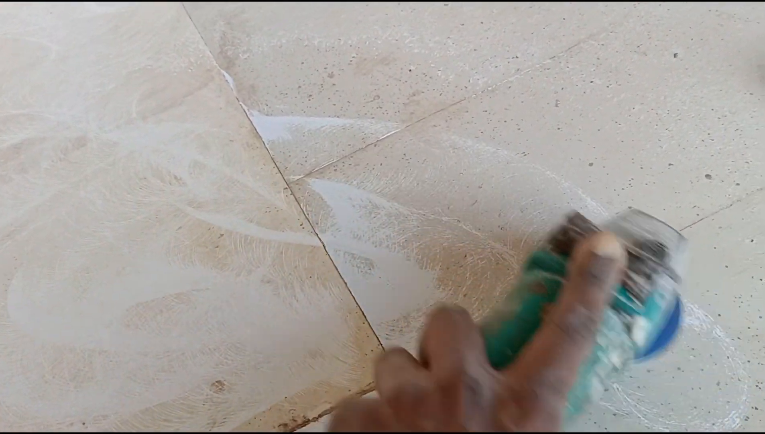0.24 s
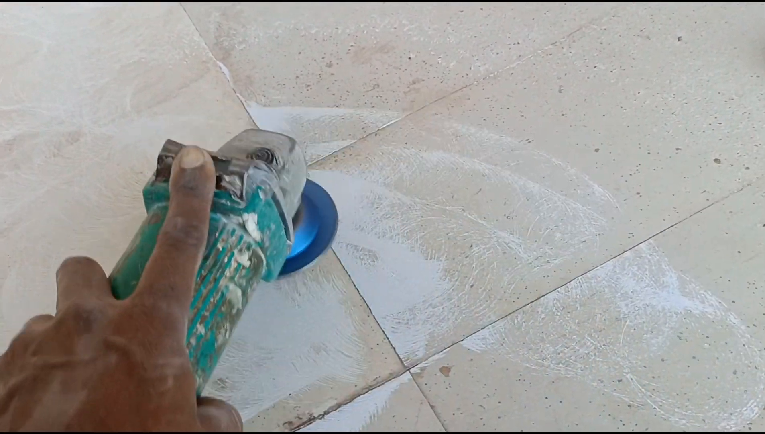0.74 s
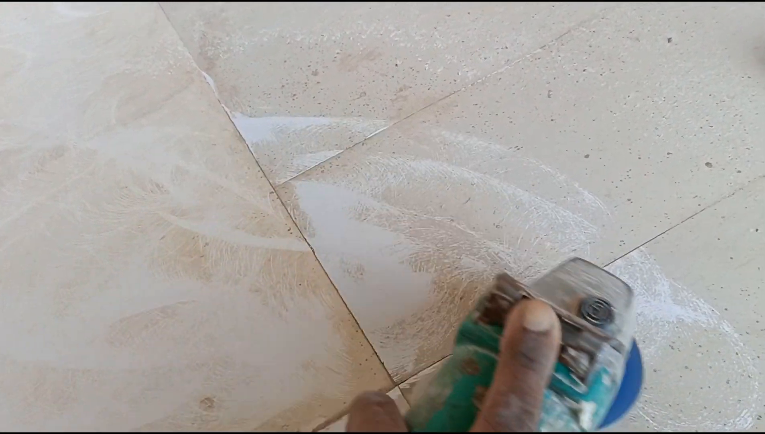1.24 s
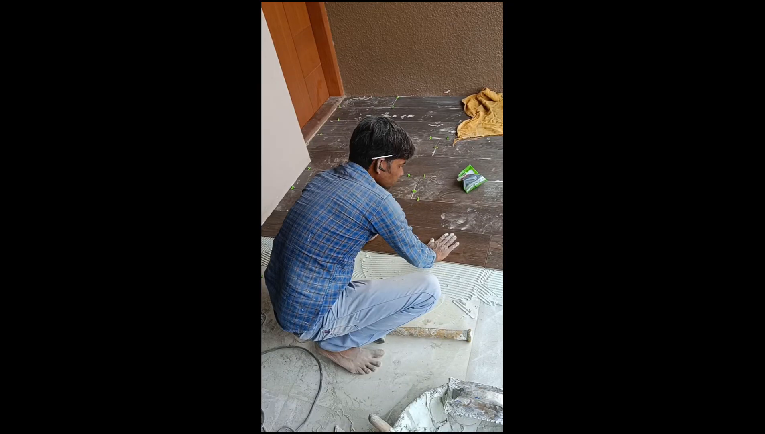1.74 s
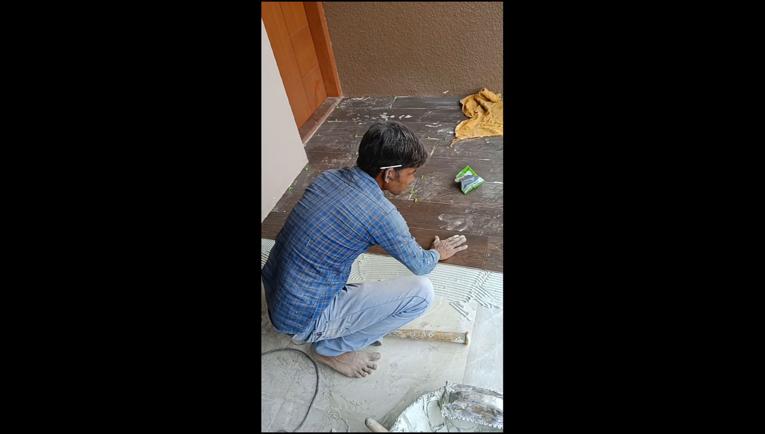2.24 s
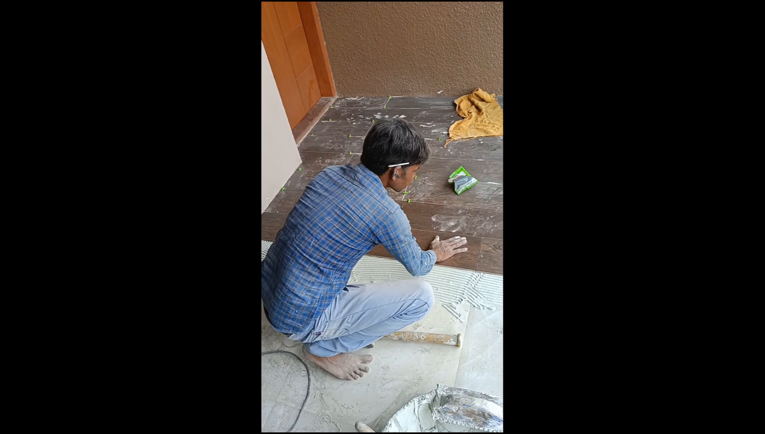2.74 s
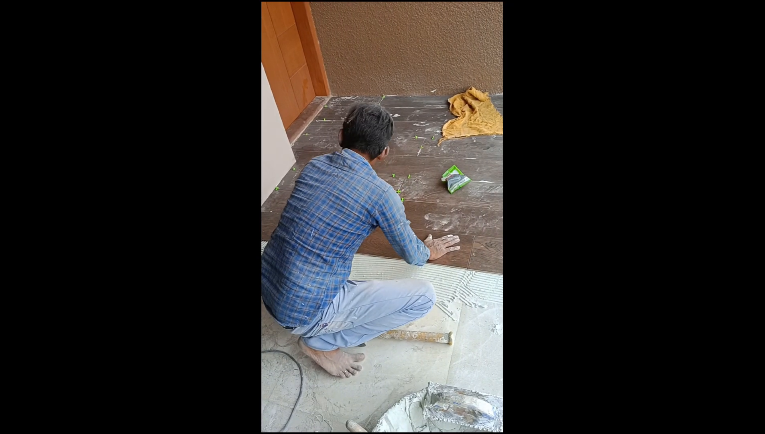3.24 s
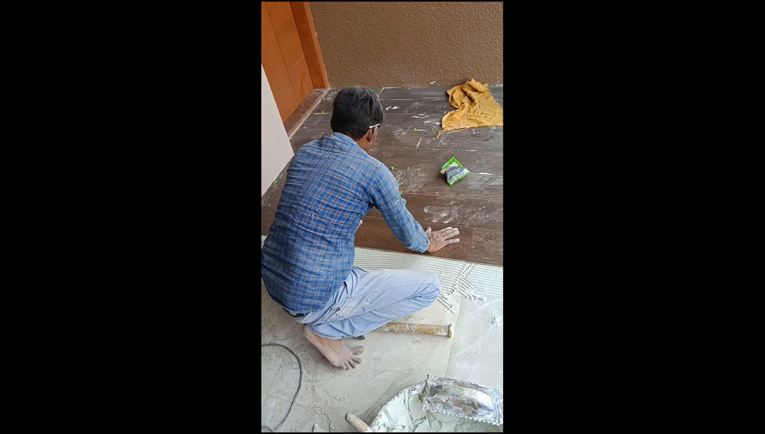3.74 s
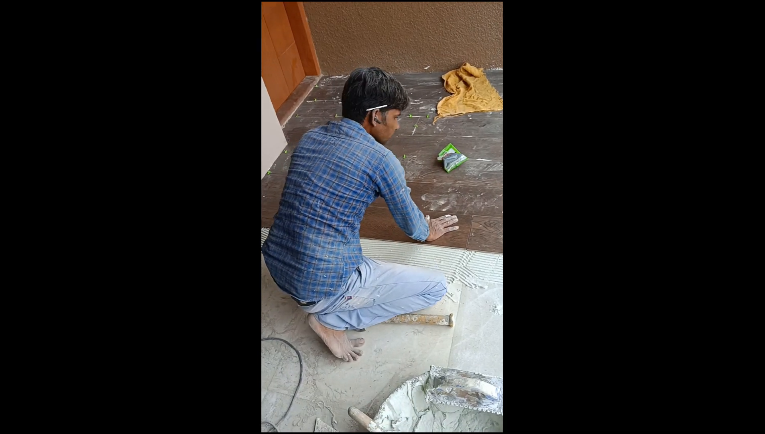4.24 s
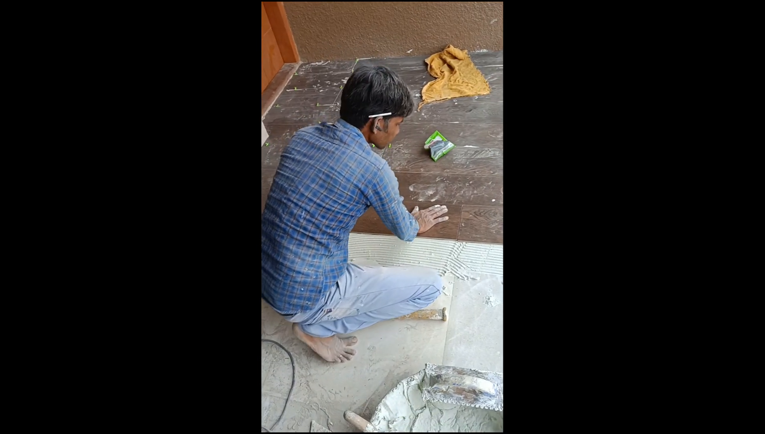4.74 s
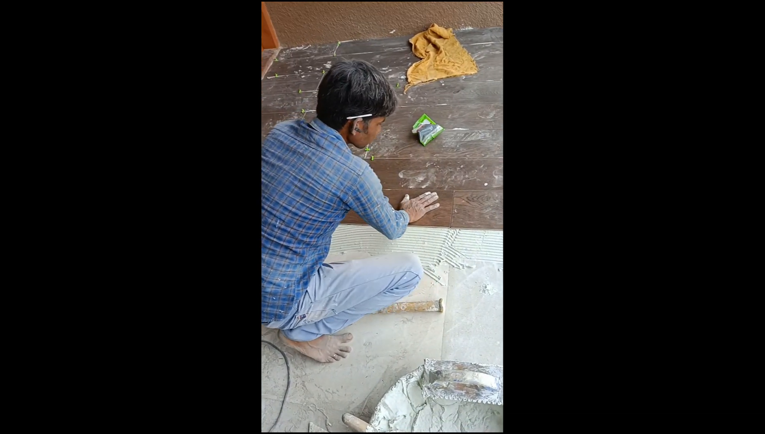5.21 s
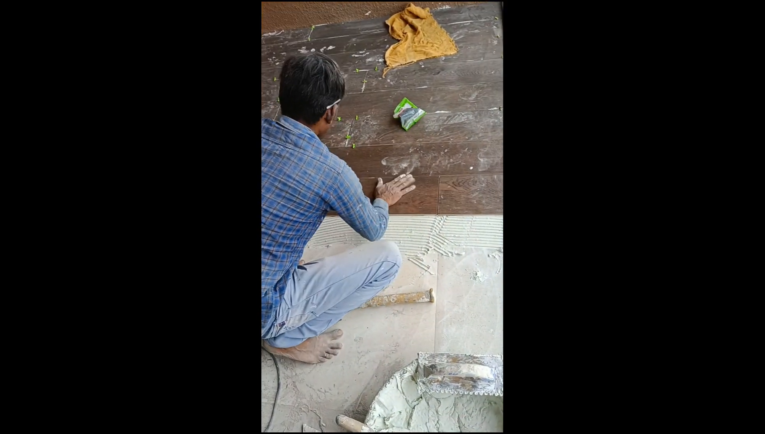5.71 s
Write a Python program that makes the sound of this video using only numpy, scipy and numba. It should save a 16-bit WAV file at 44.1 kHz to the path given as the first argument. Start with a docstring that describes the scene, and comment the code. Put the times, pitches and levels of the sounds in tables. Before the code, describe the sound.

From 0 to 1.4 s an angle grinder scours floor tile right beside a phone: a loud, dense, scratchy roar, stronger on the right, with bassy fan wind slapping the microphone, a low motor hum, faint gear whine, hissing disc ring and a thin squeal around 0.5-0.95 s. It drops away quickly, leaving a very brief gap. From 1.57 s a quiet, bare, reverberant room appears with soft air, low rumble and small wind puffs. A gritty hand wipe swells until 1.84 s. Hard mallet knocks on tile crack at 2.2 and 2.6 s, with short ringing and boomy tails held up by automatic gain. A duller double clack follows at 2.8 s, then small scuffs and ticks from 3.1 to 4.2 s. Dull distant hammer blows recur roughly every half second, with faint far beeps. Another wipe rises at 4.7-4.87 s; the loudest knock lands at 5.8 s, its echo cut by the end.

```python
"""In a room under repair, an angle grinder scours floor tiles close to a phone, its fan blowing on the microphone.
After a cut the room is bare: a tile is knocked down hard, a hand wipes grit over it, someone hammers far away.
Grinder, grit and air are coloured noise whose bands swell and flicker, with sines for shaft, gears and squeal.
Blows are short noise bursts that leave a dying echo; the tile and the room's standing waves ring as sines.
The phone's gain control squeezes the loud knocks so that their tails hang on."""
import sys
import numpy as np
from scipy import signal
from scipy.fft import rfft, irfft, next_fast_len
from scipy.io import wavfile
from scipy.ndimage import uniform_filter1d
from numba import njit

SR = 44100
rng = np.random.default_rng(int(sys.argv[2]) if len(sys.argv) > 2 else 0)


def master(y):
    """Save y as 16-bit WAV."""
    cut = np.clip(np.atleast_2d(y).T, -1, 1)
    pcm = np.round(cut * 32767)  # scale
    wavfile.write(sys.argv[1], SR, pcm.astype(np.int16))


N = 263277
T = np.arange(N) / SR
CUT_S, BACK_S, FADE_S = 1.436, 1.567, 0.026  # grinder starts to fade, room begins, length of its fade-in

# Frequency axes in octaves (log2 of Hz): whole sound, short moving frames, single blows
M = 2 * next_fast_len(N // 2 + SR // 8)
LOGF = np.log2(np.maximum(np.arange(M // 2 + 1) * SR / M, 1))
FRAME, HOP = 1024, 256  # samples
FRAME_LOGF = np.log2(np.maximum(np.arange(FRAME // 2 + 1) * SR / FRAME, 1))[:, None]
FRAME_S = np.arange(N // HOP + 2) * HOP / SR
SHORT = 16384  # samples
SHORT_LOGF = np.log2(np.maximum(np.arange(SHORT // 2 + 1) * SR / SHORT, 1))
LEAD_S = SHORT / SR / 8  # empty time before the contact in each blow
CONTACT_S = np.maximum(np.arange(SHORT) / SR - LEAD_S, 0)  # time since the contact


def undb(db):
    """Turn decibels into a plain gain."""
    return 10 ** (np.asarray(db) / 20)


def level(x, db):
    """Multiply by the wanted level and divide by the sound's own average level."""
    return x * undb(db) / np.sqrt(np.mean(x ** 2))


def on_log(table, logf=LOGF):
    """Read a (pitch_hz, value) table on a log-frequency axis."""
    hz, value = np.transpose(table)
    return np.interp(logf, np.log2(hz), value)


def shape(x, gain):
    """Filter a sound with one gain per frequency."""
    return irfft(rfft(x, M) * gain, M)[..., :N]


def curves(table, t=T):
    """Read the columns of a table as curves over time."""
    s, *columns = np.transpose(table)
    return [np.interp(t, s, column) for column in columns]


def window(start, end, edge):
    """Rise from 0 to 1 after the start and fall back before the end."""
    return np.clip(np.minimum(T - start, end - T) / edge, 0, 1)


def add(out, s, x):
    """Mix a sound in at s seconds."""
    i = int(s * SR)
    out[..., i:i + x.shape[-1]] += x[..., :N - i]


def walk(rate, count=1):
    """Random levels held about 1 / rate s and smoothed, one value a frame; spread near 1."""
    k = max(int(SR / HOP / rate), 1)
    frames = len(FRAME_S)
    held = np.repeat(rng.standard_normal((count, frames)), k, axis=1)[:, :frames]
    return 2.13 * uniform_filter1d(uniform_filter1d(held, k), k)


def wobble(rate, count=2 * SR):
    """A random walk with one value a sample."""
    return np.interp(T[:count], FRAME_S, walk(rate)[0])


def stereo_noise(alike):
    """Spectra of two noises; alike says how much they share at each frequency."""
    a, b, c, d = rng.standard_normal((4, len(alike))) * np.sqrt(len(alike) / 2)
    mid = (a + 1j * b) * np.sqrt(1 + alike)
    side = (c + 1j * d) * np.sqrt(1 - alike)
    return np.array([mid + side, mid - side])


def bands(spectrum, gain):
    """Play a noise spectrum through a gain that moves over frequency and time."""
    noise = irfft(spectrum, M)[:, :N]
    z = signal.stft(noise, nperseg=FRAME, noverlap=FRAME - HOP)[2]
    moved = z * gain[:, :z.shape[-1]]
    return signal.istft(moved, nperseg=FRAME, noverlap=FRAME - HOP)[1][:, :N]


def restless(spectrum, swell_db, flicker_db, rate, extra_db=0):
    """Noise whose third-octave bands swell together and flicker alone."""
    band = (3 * FRAME_LOGF[:, 0]).astype(int)
    swell = swell_db * walk(3.6)
    flicker = flicker_db * walk(rate, count=band[-1] + 1)[band]
    return bands(spectrum, undb(swell + flicker + extra_db))


def panned(table):
    """Left and right gains from a left-minus-right table."""
    half_db = on_log(table) / 2
    return undb([half_db, -half_db])


def room_alike(logf=LOGF, alike_hz=506):
    """Slow waves press nearly alike on both microphone ports; quick ones differ."""
    return .96 / (1 + (2 ** logf / alike_hz) ** 4)


# How the bare room leans to one side: pitch_hz, left_minus_right_db
ROOM_BALANCE = [(60, 3), (110, 1), (200, 1), (380, -3), (700, 0), (1290, -1), (2380, -6.5), (4400, -0.5),
                (8120, 0.5), (15000, -1)]
# Tone colour of the room air: pitch_hz, level_db (per Hz, relative)
AIR_COLOUR = [(20, -17), (40, -7), (65, -10), (125, -6.5), (220, -8), (500, -15), (1000, -18),
              (2100, -24.5), (3100, -35), (4000, -33), (6500, -36), (8000, -50.5), (12000, -52.5),
              (15800, -50)]
# Puffs of air over the ports: centre_s, half_length_s, level_db
AIR_GUSTS = [(1.663, 0.038, -40), (1.788, .06, -42)]
# Rumble from the street: time_s, level_db
STREET_RUMBLE = [(1.57, -49.5), (1.8, -47), (2.3, -55), (3.6, -51.5), (3.8, -46.5), (4.6, -55),
                 (4.85, -57.5), (5.15, -56), (5.97, -54)]


def background():
    """Quiet room air, low street rumble and gusts on the ports, all made of filtered noise."""
    air = stereo_noise(room_alike()) * undb(on_log(AIR_COLOUR)) * panned(ROOM_BALANCE)
    air = restless(air, swell_db=.3, flicker_db=.8, rate=8)
    gust = stereo_noise(0 * LOGF + 0.25) * np.exp(-((LOGF - np.log2(60)) / 1.12) ** 2)
    puffs = sum(undb(db) * np.exp(-((T - s) / half) ** 2) for s, half, db in AIR_GUSTS)
    gust = level(irfft(gust, M)[:, :N], 0) * puffs
    rumble = stereo_noise(0 * LOGF + 0.73) * np.exp(-((LOGF - np.log2(26)) / 0.62) ** 2)
    rumble = level(irfft(rumble, M)[:, :N], 0) * undb(curves(STREET_RUMBLE)[0])
    return level(air, -52) + gust + rumble


# Far horn and beeps, and swells of a thin whistle: start_s, end_s, pitch_hz, level_db (before it wavers)
FAR_TONES = [(1.904, 2.1, 1880, -67), (2.972, 3.115, 3750, -71), (3.152, 3.5, 3760, -77),
             (3.3, 4.4, 1880, -71), (3.542, 3.72, 3760, -66), (4.14, 4.207, 3700, -63),
             (4.272, 4.366, 3690, -63.5), (4.32, 4.38, 1480, -62), (5.198, 5.32, 3700, -71.5),
             (5.627, 5.681, 1470, -60), (5.658, 5.835, 3700, -72), (5.697, 5.813, 677, -43)]


def far_tones():
    """Short far sines with soft edges, wavering in level."""
    out = np.zeros(N)
    for start, end, hz, db in FAR_TONES:
        t = T[:int((end - start) * SR)]
        edge = np.clip(np.minimum(t, t[-1] - t) / 0.02, 0, 1)
        waver = undb(db + 1.6 * wobble(25, count=len(t)))
        add(out, start, waver * edge * np.sin(2 * np.pi * hz * t))
    return out


# Strokes of the hand over grit: land_s, lift_s, level_db (of the bright part, at the lift)
HAND_WIPES = [(1.58, 1.842, -38.5), (3.79, 3.842, -63), (3.9, 3.95, -59), (4.686, 4.871, -41),
              (5.136, 5.162, -58), (5.567, 5.575, -65)]
# Tone colour of the grit: pitch_hz, level_db (per Hz, relative)
GRIT_COLOUR = [(350, -20), (600, -14), (879, -13), (1080, -18.5), (1220, -12), (1600, -13.5), (2140, 1),
               (2850, -8.5), (3170, -6.5), (6030, -6.5), (8370, -16), (14600, -23.5), (15700, -24)]
LAND_DB_PER_S, PRESS_DB_PER_S, LIFT_DB_PER_S = 200, 46.5, 235
DULL_DB, DULL_PER_DB = -9, 0.1  # dull against bright part at a -43 dB wipe; its growth per dB of wipe
WIPE_PAN_DB = -1  # left minus right


def wipes():
    """Dry grit friction: the hand lands, presses ever harder, lifts; the dull part grows with pressure."""
    grit = stereo_noise(room_alike()) * undb(on_log(GRIT_COLOUR)) * panned(ROOM_BALANCE)
    grit = restless(grit, swell_db=.3, flicker_db=.8, rate=30)
    dull = shape(grit, LOGF < np.log2(1800))
    bright = grit - dull
    strokes = []
    for land, lift, top_db in HAND_WIPES:
        press = PRESS_DB_PER_S * np.maximum(lift - T, 0)
        landing = LAND_DB_PER_S * np.maximum(land - T, 0)
        lifting = LIFT_DB_PER_S * np.maximum(T - lift, 0)
        strokes.append(top_db - press - landing - lifting)
    wipe_db = np.max(strokes, axis=0)
    dull_db = DULL_DB + DULL_PER_DB * (wipe_db + 43)
    side_db = np.array([[WIPE_PAN_DB], [-WIPE_PAN_DB]]) / 2
    return undb(wipe_db + side_db) * (level(bright, 0) + undb(dull_db) * level(dull, 0))


# Time the room's echo takes to die by 60 dB: pitch_hz, decay_s
ECHO_DECAY = [(60, 1), (200, 0.83), (500, 0.55), (1500, 0.38), (4000, 0.38), (12000, 0.26)]


def burst(blow, colour, s, db, wet_db):
    """One blow: its direct noise, thin in the bass, and the power of the echo dying band by band."""
    gain = colour(SHORT_LOGF)
    size = undb(db) / np.sqrt(np.mean(gain ** 2))
    crack = irfft(stereo_noise(room_alike(SHORT_LOGF))) * blow
    direct = irfft(rfft(crack) * gain / (1 + (380 / 2 ** SHORT_LOGF) ** 4))
    age = FRAME_S - s - .008  # the echo starts 8 ms after the blow
    decay = 1000 ** (-np.abs(age) / on_log(ECHO_DECAY, FRAME_LOGF))
    tail = colour(FRAME_LOGF) * decay * (age > 0)
    return size * direct, (size * undb(wet_db) * tail) ** 2


def small_blows(rows):
    """Noise bursts around one pitch that rise fast and die away."""
    out, tails = np.zeros((2, N)), 0
    for s, db, hz, octaves, length, wet_db in rows:
        rise = 0.054 * length
        blow = np.exp(-CONTACT_S / length) * (1 - np.exp(-CONTACT_S / rise))
        colour = lambda f: np.exp(-((f - np.log2(hz)) / octaves) ** 2)
        direct, tail = burst(blow, colour, s, db, wet_db)
        add(out, s - LEAD_S, direct)
        tails = tails + tail
    return out, tails


# Far hammer blows: start_s, level_db (before the bass is thinned)
HAMMER_BLOWS = [(1.675, -47), (2.018, -43), (3.201, -40), (3.637, -41), (4.081, -45.5), (4.54, -42.5),
                (4.986, -40.5), (5.458, -47)]
HAMMER_HZ, HAMMER_OCTAVES, HAMMER_S, HAMMER_ECHO_DB = 895, 0.58, .011, -12.5


def far_hammer():
    """Dull far blows, all of one pitch and length."""
    return small_blows([(s, db, HAMMER_HZ, HAMMER_OCTAVES, HAMMER_S, HAMMER_ECHO_DB) for s, db in HAMMER_BLOWS])


# Clacks, scuffs and ticks of tools and grit: start_s, level_db (before the bass is thinned),
# pitch_hz, width_octaves, length_s (dying time), echo_db (against the blow)
SMALL_CLACKS = [(2.809, -29.5, 1284, 0.46, 0.046, -9.5), (2.828, -26, 1030, 0.62, .03, -2.5),
                (3.102, -48, 1990, 0.97, 0.071, -1), (3.105, -53.5, 3935, 0.03, 0.045, 2),
                (3.49, -46, 1800, 0.83, 0.0052, -8.5), (3.492, -47.5, 5860, .64, .024, -12),
                (3.591, -50.5, 2200, 0.68, 0.017, 3.5), (3.82, -69, 7000, 1.5, .01, -11),
                (3.955, -58, 10000, 1.1, .012, -15), (4.088, -61, 11000, 1.1, 0.0099, -9),
                (4.225, -70, 11000, 1.1, .01, -15)]


def clacks():
    """Small contacts, each with its own pitch, width and length."""
    return small_blows(SMALL_CLACKS)


def ring(modes, length):
    """Sum of dying sines."""
    t = np.arange(int(length * SR)) / SR
    return sum(undb(db) * np.sin(2 * np.pi * hz * t) * 1000 ** (-t / t60) for hz, db, t60 in modes)


# Mallet on tile, each blow on another spot that favours another band: start_s, level_db (before the bass
# is thinned), bounce_delay_s, bounce_db (against the first contact), echo_db (against the blow),
# standing_waves_db, brightness_db_per_octave, favoured_hz, favoured_db
MALLET_KNOCKS = [(2.2169, -6.5, 0.0033, 5, -9, -10.5, 1.34, 2560, 5),
                 (2.5952, -3, 0.0033, -19, -6, -9, 0.25, 1850, 6),
                 (5.8138, 1, 0.0036, -19, -10.5, -10, 0.8, 840, 2.5)]
# Tone colour of a knock: pitch_hz, level_db (per Hz, relative)
MALLET_COLOUR = [(35, -40), (60, -25), (240, 0), (335, -9.5), (420, -5), (700, -10.5), (1300, -14),
                 (2300, -18), (2900, -29), (6000, -30), (7400, -36.5), (8200, -46), (14000, -54.5),
                 (15500, -54)]
# Ringing of the tile: pitch_hz, level_db (relative), decay_s (to fall 60 dB)
TILE_RING = [(512, 1.5, 0.09), (568, -3.5, 0.09), (705, -6.5, 0.036), (990, -5, 0.1), (1785, -3.5, 0.02),
             (2210, -12, 0.056)]
# Standing waves of the room: pitch_hz, level_db (relative, before the build-up), decay_s (to fall 60 dB)
STANDING_WAVES = [(133.7, -5, 1), (139.8, -13.5, 0.65), (204.8, -8.5, 0.8), (223.6, -11, 0.874),
                  (263.6, 3.5, 0.15), (365, -20, 0.4), (452, -17.5, 0.89)]
BLOW_S, BOUNCE_S = .0022, .0026  # dying times of the mallet's contact and bounce
BUILD_S = .045  # standing waves build up
SPOT_OCTAVES = .3  # reach of the favoured band


def knocks():
    """Mallet cracks with a bounce, ringing tile and slowly building standing waves."""
    standing = ring(STANDING_WAVES, 1) * (1 - np.exp(-T[:SR] / BUILD_S))
    out, tails = np.zeros((2, N)), 0
    for s, db, lag, bounce_db, wet_db, boom_db, tilt_db, spot_hz, spot_db in MALLET_KNOCKS:
        def colour(f):
            """Knock colour tilted around 1024 Hz and lifted at the favoured band."""
            spot = spot_db * np.exp(-((f - np.log2(spot_hz)) / SPOT_OCTAVES) ** 2)
            return undb(on_log(MALLET_COLOUR, f) + tilt_db * (f - 10) + spot)

        hit = np.exp(-CONTACT_S / BLOW_S) * (CONTACT_S > 0)
        bounce = np.exp(-np.abs(CONTACT_S - lag) / BOUNCE_S) * (CONTACT_S > lag)
        direct, tail = burst(hit + undb(bounce_db) * bounce, colour, s, db, wet_db)
        add(out, s - LEAD_S, direct)
        add(out, s, undb(db - 13.5) * ring(TILE_RING, 0.28))
        add(out, s, undb(boom_db) * standing)
        tails = tails + tail
    return out, tails


def room(direct, tails):
    """Direct sounds plus the dense noise echo that the blows leave."""
    echo = bands(stereo_noise(room_alike()), np.sqrt(tails))
    return shape(direct + echo, panned(ROOM_BALANCE))


# Tone colour of the scouring: pitch_hz, level_db (per Hz, relative)
SCOUR_COLOUR = [(12, -40.5), (24, -2), (62, -0.5), (107, 0), (220, -6), (454, -10), (863, -7.5),
                (2350, -13), (3110, -16), (5910, -16), (7390, -17), (8980, -30.5), (10000, -23.5),
                (12500, -33), (15700, -28.5)]
# How the scouring leans to one side: pitch_hz, left_minus_right_db
SCOUR_BALANCE = [(60, -14.5), (110, -6), (200, -20), (380, -17), (700, -14), (1290, -8), (2380, -8.5),
                 (4400, -2), (8120, -3), (15000, -8.5)]
# Ringing of the disc, added to the colour: pitch_hz, width_hz, boost_db
DISC_RING = [(6420, 290, 1), (9600, 540, 2.5), (11600, 200, 9.5), (13100, 230, 14), (13740, 280, 16.5),
             (15200, 330, 14.5)]
GRIND_DB = -10.5  # level of the roar's first second
SLAP_DB = 3.5  # strength of the quick slaps of air
BODY_DB_PER_S = 1  # the tile's body swells as the disc bears down


def scouring():
    """Disc scraping tile: coloured noise, with fan wind slapping each port on its own."""
    hz = 2 ** LOGF
    ringing = sum(db / (1 + (2 * (hz - f) / width) ** 2) for f, width, db in DISC_RING)
    noise = stereo_noise(0 * hz + 0.021) * undb(on_log(SCOUR_COLOUR) + ringing) * panned(SCOUR_BALANCE)
    # wind, tile body, scrape and disc hiss come and go on their own
    part = np.searchsorted(np.log2([300, 1500, 8000]), FRAME_LOGF[:, 0])
    moving_db = (np.array([[1.2], [.8], [.2], [.4]]) * walk(9.2, count=4))[part]
    moving_db = moving_db + (part == 1)[:, None] * BODY_DB_PER_S * FRAME_S
    roar = restless(noise, swell_db=1.6, flicker_db=0.33, rate=24, extra_db=moving_db)
    # eddies slap each port in quick uneven pulses, heard mostly low down
    slaps = np.repeat(rng.standard_normal((2, N // 200 + 1)), 200, axis=1)[:, :N]
    slaps = uniform_filter1d(slaps, size=200)
    roar = roar + (undb(SLAP_DB * slaps) - 1) * shape(roar, 1 / (1 + (hz / 1800) ** 2))
    return roar * undb(GRIND_DB) / np.std(roar[:, :SR])


# Shaft and gear tones: multiple (of the shaft speed), level_db (before it wavers)
SHAFT_TONES = [(1, -29), (2, -35.5), (3, -36), (4, -43), (19.4, -43), (20.7, -42), (27, -44.5),
               (38.4, -43.5)]
SHAFT_HZ = 194.6  # middle speed, in turns a second
# Squeal of the disc's edge: time_s, pitch_hz, level_db (before it wavers)
EDGE_SQUEAL = [(.52, 5840, -36), (.62, 5845, -31), (.78, 5815, -28), (.95, 5765, -30)]


def grinder():
    """Scouring that throbs once a shaft turn, tones locked to the shaft, and a squealing disc edge."""
    turn = 2 * np.pi * np.cumsum(SHAFT_HZ * (1 + 0.0028 * wobble(3.8, count=N))) / SR
    phases = rng.uniform(0, 2 * np.pi, (len(SHAFT_TONES), 2, 1))
    whine = 0
    for (multiple, db), phase in zip(SHAFT_TONES, phases):
        whine = whine + undb(db + 2.66 * wobble(7.8)) * np.sin(multiple * turn[:2 * SR] + phase)
    squeal_hz, squeal_db = curves(EDGE_SQUEAL)
    squeal = undb(squeal_db + 1.5 * wobble(30, count=N)) * np.sin(2 * np.pi * np.cumsum(squeal_hz) / SR)
    squeal = squeal * window(EDGE_SQUEAL[0][0], EDGE_SQUEAL[-1][0], 0.043)
    out = scouring() * (1 + .06 * np.cos(turn)) + squeal
    add(out, 0, whine)
    return out * (T < BACK_S)


def scene():
    """The grinder first, then the bare room with its knocks, wipes and far sounds."""
    hammer, hammer_tails = far_hammer()
    clack, clack_tails = clacks()
    knock, knock_tails = knocks()
    direct = hammer + clack + knock + far_tones()
    later = room(direct, hammer_tails + clack_tails + knock_tails) + wipes() + background()
    return grinder() + later * (T >= BACK_S)


@njit
def squeeze(loud, top, slope, attack, release):
    """Gain that falls when a follower of the sound's level passes the top."""
    gain, follower = np.empty(len(loud)), 0.
    for i in range(len(loud)):
        follower += (loud[i] - follower) * (attack if loud[i] > follower else release)
        gain[i] = (top / max(follower, top)) ** slope
    return gain


def record(dry):
    """The phone's gain control and rounded peaks, the cut between the two shots, and the missing top."""
    loud = np.abs(dry).max(axis=0)
    # 6 ms to turn down, 70 ms to recover
    gain = squeeze(loud, float(undb(-19.5)), 0.55, 1 / (0.006 * SR), 1 / (.07 * SR))
    x = np.tanh(1.223 * dry * gain) / 1.047
    fade_out = 1000 ** (-np.maximum(T - CUT_S, 0) / 0.022)
    fade_in = np.clip((T - BACK_S) / FADE_S, 0, 1)
    edit = np.where(T < BACK_S, fade_out, fade_in)
    # almost nothing is left above 15900 Hz
    return shape(x * edit, np.clip((15900 - 2 ** LOGF) / 150, 0, 1) + 1e-4)


dry = scene()
out = record(dry)
master(out)
```